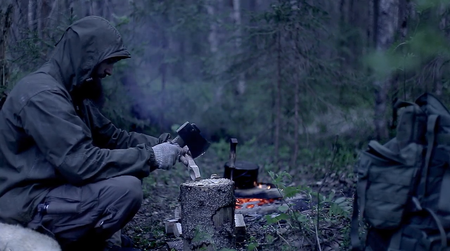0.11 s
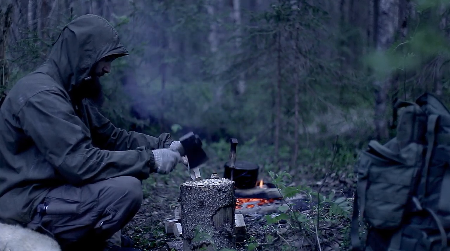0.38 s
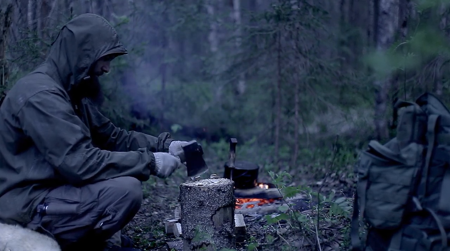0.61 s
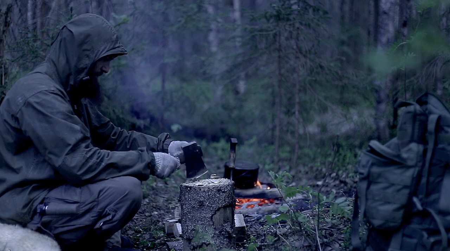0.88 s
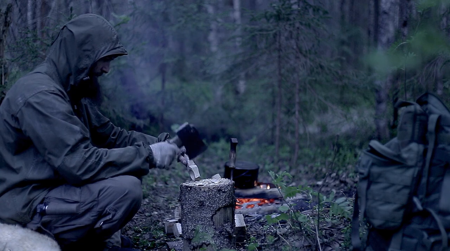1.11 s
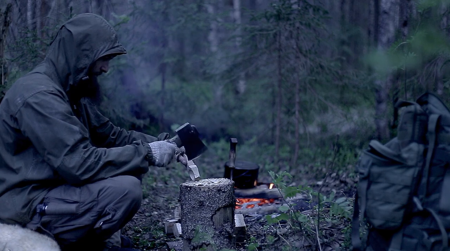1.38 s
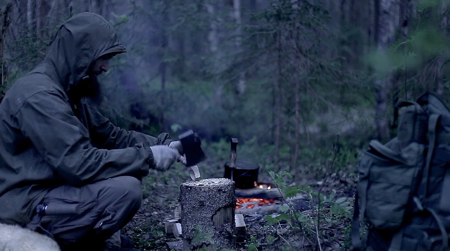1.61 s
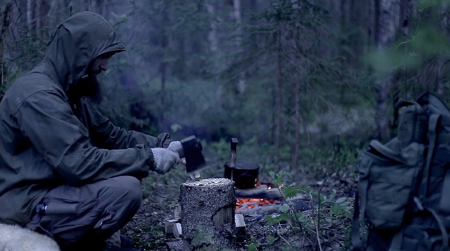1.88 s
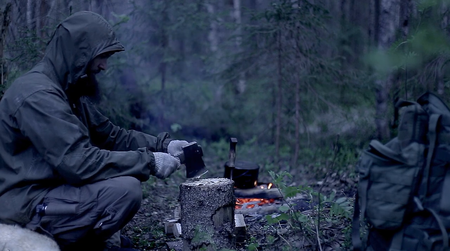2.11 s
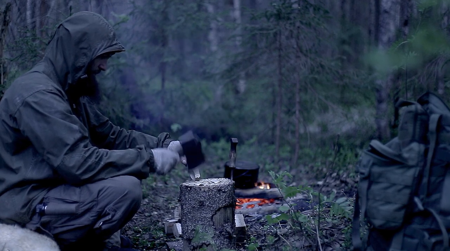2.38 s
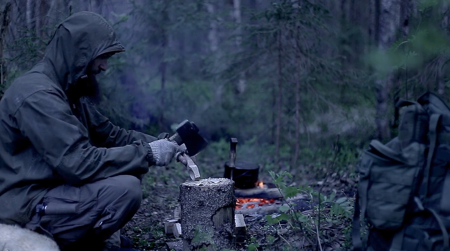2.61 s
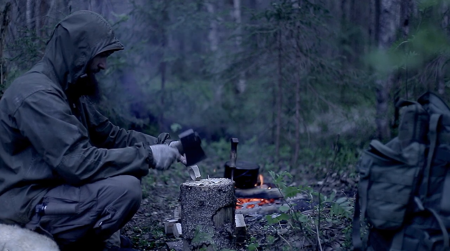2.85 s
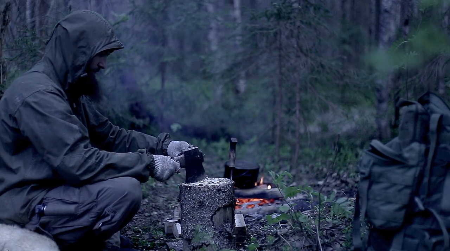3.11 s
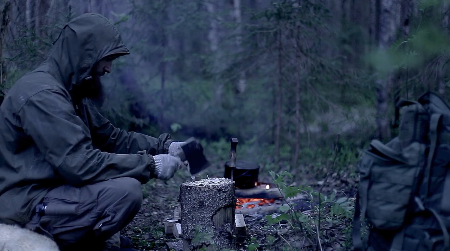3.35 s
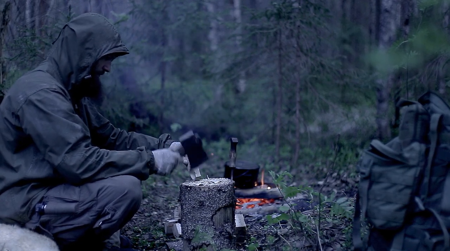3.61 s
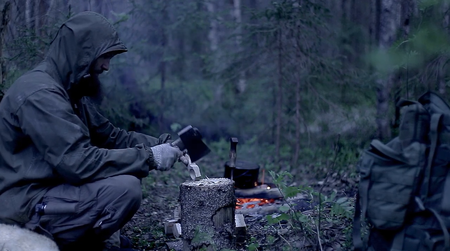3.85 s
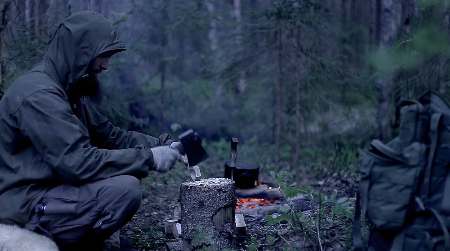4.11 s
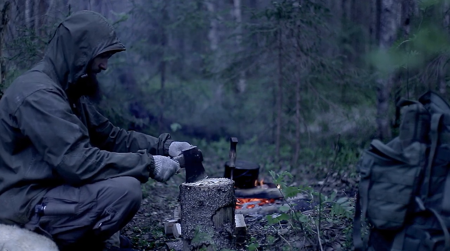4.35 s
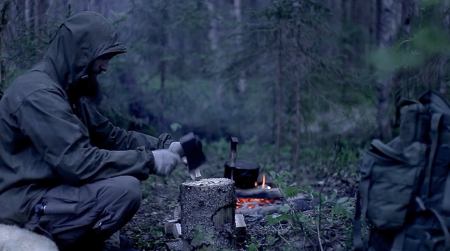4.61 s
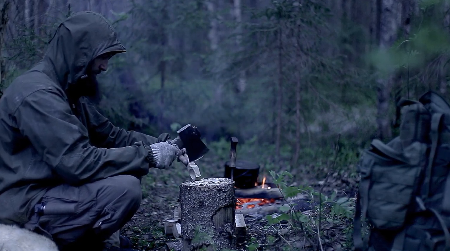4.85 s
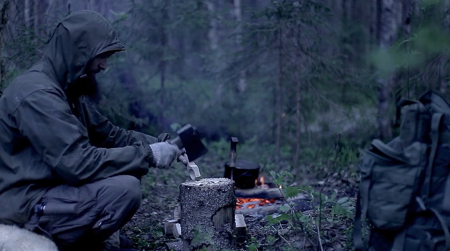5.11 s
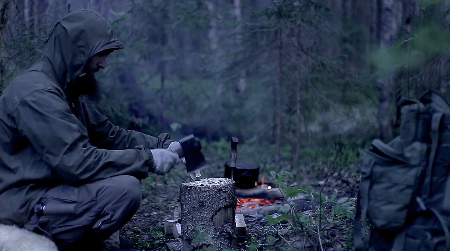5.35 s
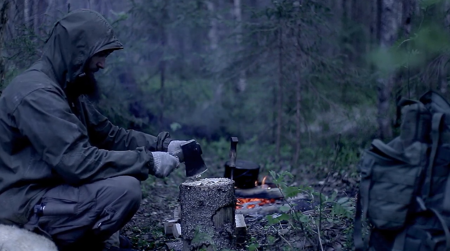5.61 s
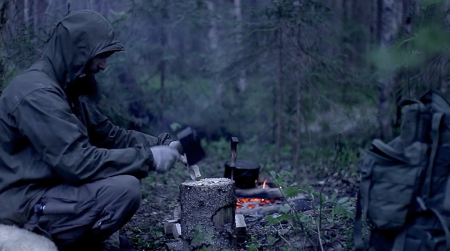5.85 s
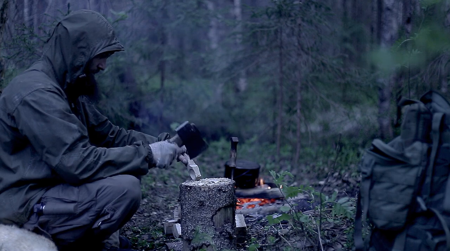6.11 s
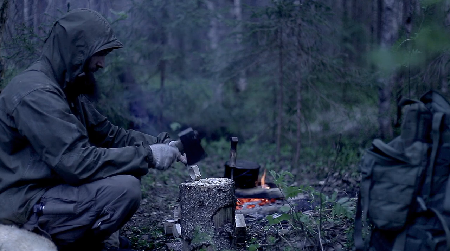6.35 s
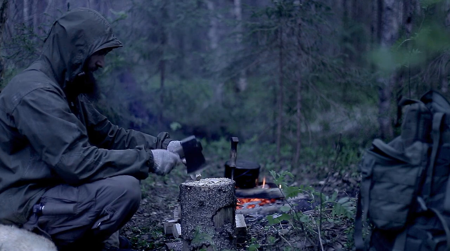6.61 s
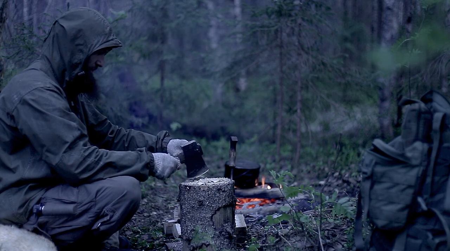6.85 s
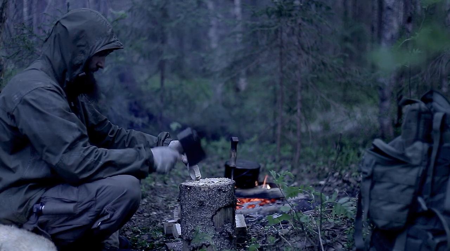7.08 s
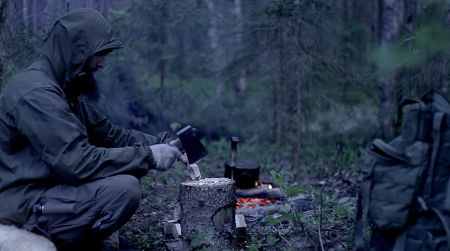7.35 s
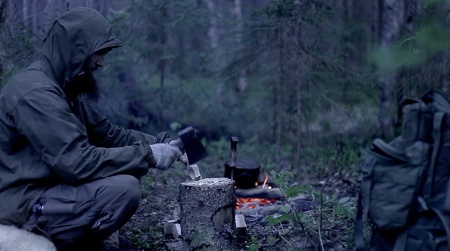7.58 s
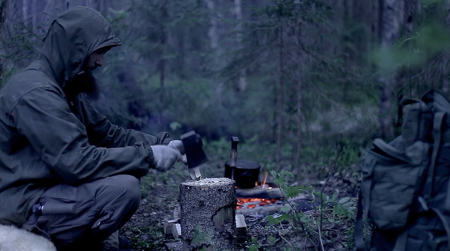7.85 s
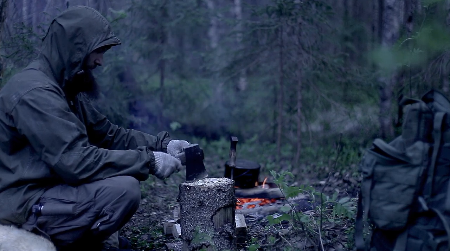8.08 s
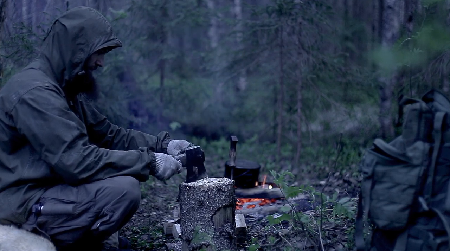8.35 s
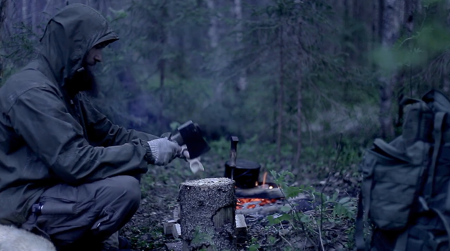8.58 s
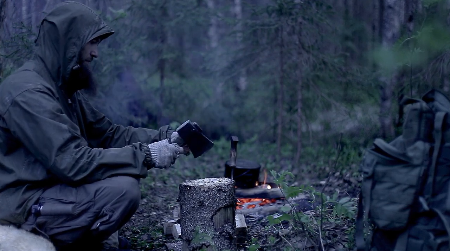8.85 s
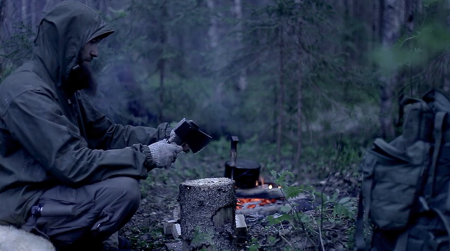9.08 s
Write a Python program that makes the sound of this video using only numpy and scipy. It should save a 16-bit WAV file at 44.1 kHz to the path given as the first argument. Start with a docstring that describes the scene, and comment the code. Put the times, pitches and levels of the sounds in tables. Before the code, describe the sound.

Steady chopping of kindling on a stump, close to the microphone: crisp, dry wood cracks mixed with short metallic clicks, uneven in strength and growing harder past the middle. A loosened blade briefly rings a few times and bits of wood clatter down. Trunks return a faint scattered slap, the soil gives a late low shudder, and a soft airy wash continues after knocking stops near eight and a quarter seconds.

```python
"""A hatchet stuck in a stick of kindling is knocked on a stump in a forest, about three blows a second.
Each blow is one to three quick contacts, made of decaying sine modes of wood and steel; loud ones overload.
The loosened blade rings on and split pieces drop; faint ticks and scrapes are short rings and band noise.
Trunks send back echoes (convolution with sparse noise), the soil carries a late low shudder to the
microphone stand, and shaped noise makes a soft wash of forest air, with amplifier hiss."""
import sys
import numpy as np
from scipy import signal
from scipy.fft import rfft, irfft
from scipy.io import wavfile

SR = 44100
rng = np.random.default_rng(int(sys.argv[2]) if len(sys.argv) > 2 else 0)


def store_pcm(level_fs):
    """Save levels as 16-bit WAV."""
    pcm = np.round(np.clip(level_fs, -1, 1) * 32767).astype(np.int16)
    wavfile.write(sys.argv[1], SR, np.atleast_2d(pcm).T)


def boost(x):
    """Linear amplitude factor 10**(x/20) for a level x in decibels (scalar or array-like)."""
    u = np.asarray(x, float) / 20
    return 10 ** u


N = 406161

# air wash: frequency_hz, relative_density_db
AIR_SPECTRUM = [(12, -64), (20, 6), (119, -0.5), (289, -1), (323, -3), (392, -2.5), (595, -2), (703, -1.5),
                (1010, -7.5), (1910, -13.5), (2260, -11.5), (4290, -15), (15400, -22.5)]
# hollow notes in the air: centre_hz, width_hz, added_db
AIR_NOTES = [(281, 22, 8), (439, 80, 2.5), (970, 50, 3.5), (1540, 360, 6)]
AIR_RMS_DB, HISS_RMS_DB = -50.5, -58

# soil waves: frequency_hz, level_db, t60_s, travel_s
SOIL_WAVES = [(61.4, 0.9, 0.63, 0.053), (52.9, -9.2, 0.9, 0.0681), (40.2, 0.2, 0.62, 0.0653),
              (28.2, 4.8, 0.45, 0.0801), (23.1, -13.5, 2.0, 0.0811), (59.2, 12.0, 0.38, 0.0765)]
# the shudder levels off once the weight passes what the soil yields to
SHUDDER_DB, SOIL_YIELDS_DB = -37.5, -25

# near trunks: delay_s, level_db
TRUNK_ECHOES = [(0.019, -23), (.059, -26), (.086, -42.5)]
# reflection colour of bark and needles: frequency_hz, gain_db
BARK_COLOUR = [(500, -22.5), (1200, -11.5), (1700, -1), (2400, 4.5), (3200, 0), (3800, -1.5), (4300, 2.5),
               (5300, -2), (6200, -7.5), (8200, -5.5), (11000, -27)]
ECHO_SMEAR_S = 0.0016
SCATTER_DB, SCATTER_T60_S = -57.5, 0.7   # many far trunks

# faint ticks from the fire: start_s, level_db, pitch_hz
FIRE_TICKS = [(0.029, -37, 4970), (.063, -41.5, 5200), (2.082, -28, 1700), (2.667, -34, 7500),
              (5.109, -44, 7600), (5.938, -50, 7000), (5.948, -53, 6500), (5.985, -48, 7500)]
# stick slides on the stump: start_s, end_s, level_db
STICK_SCRAPES = [(0.799, 0.826, -38.5), (8.215, 8.234, -45)]

# nearly loose blade is set ringing: start_s, level_db
LOOSE_HITS = [(2.984, -35), (4.238, -28), (7.923, -40), (8.240, -32.5)]
# loose blade modes: frequency_hz, level_db, t60_s
LOOSE_MODES = [(3790, -6.5, 0.16), (7340, 2.5, 0.053)]
# split piece drops on the stump, sometimes the hatchet after it: start_s, level_db, weight_db
PIECE_DROPS = [(2.999, -14, -24), (3.321, -42.5, -69), (4.2587, -17, -21.5), (7.9433, -20, -51.5),
               (8.258, -14.5, -31)]
# split piece modes: frequency_hz, level_db, t60_s
PIECE_MODES = [(242, 10, 0.011), (583, 1.5, 0.017), (854, 13.5, 0.0093), (1400, 2, 0.015), (2170, 0, 0.014),
               (3950, -5.5, 0.0077)]

# stick modes: stick_pitch_ratio, level_db, t60_s (before damping)
STICK_MODES = [(0.761, -19.5, 0.036), (0.932, 0.5, 0.016), (1.07, 6, 0.012)]
# stick overtones: frequency_hz, level_db, t60_s (before damping)
OVERTONE_MODES = [(2080, -1.5, 0.0089), (2316, 1, 0.0093), (2910, -14, 0.0081)]
# blade modes: blade_pitch_ratio, level_db, t60_s (before damping)
BLADE_MODES = [(.87, -5.5, 0.0085), (.96, 1.5, 0.012), (1.04, 2, 0.013), (1.25, -21, 0.026)]
# contact crack: frequency_hz, level_db, t60_s
CRACK_MODES = [(3066, -31.5, 0.00075), (6100, -23, 0.0014), (7134, 0.5, 0.0023), (7940, -13, 0.012),
               (9320, -7, 0.01), (11320, -7.5, 0.003), (14800, -25, 0.0065)]
# blade edge, sent sideways to the trunks only: frequency_hz, level_db, t60_s
EDGE_MODES = [(4700, -7, .003), (5200, -2, .007)]
# hollow note of the weight: frequency_hz, level_db, t60_s
HOLLOW_MODES = [(785, 1, 0.047)]
# stump body: frequency_hz, level_db, t60_s
STUMP_MODES = [(222, -1.5, 0.032), (331.6, 0, 0.024), (444, 2.5, 0.012)]
# stump roots: frequency_hz, level_db, t60_s
ROOT_MODES = [(72.4, 3, 0.094), (143, 2, 0.028)]
# stick lands on the stump: start_s, level_db, pitch_hz, overtones_re_stick_db, weight_db
STICK_LANDINGS = [(0.2168, -11.5, 1370, -3, -36.5), (0.5186, -4, 1610, -5, -28.5),
                  (.8286, -9, 1550, -1, -28), (1.135, -7, 1395, -19, -18), (1.407, -32.5, 1500, 2, -49),
                  (1.44, -26, 1510, 0, -50), (1.4462, -14, 1510, 3.5, -23), (1.7425, -6, 1606, -11, -26),
                  (2.0494, -2, 1630, -21.5, -23), (2.3566, -7.5, 1600, 2.5, -54),
                  (2.36, -3, 1666, 7, -18.5), (2.4962, -27, 1060, 0.5, -37), (2.677, -6, 1470, -5, -23.5),
                  (2.9785, -15, 1430, -11, -49), (2.9828, -5.5, 1445, -7, -30.5),
                  (3.6045, -7.5, 1400, -7, -27.5), (3.9051, -9, 1180, -7.5, -17),
                  (4.2363, -12.5, 1370, -15, -31), (4.56, -13, 1510, 2.5, -23.5),
                  (4.8634, -5.5, 1580, 1, -21.5), (5.1692, -3.5, 1433, 8.5, -21.5),
                  (5.4884, -10.5, 1570, -10, -61), (5.49, -2.5, 1542, -3, -19),
                  (5.8058, 2, 1680, -4.5, -17.5), (6.1091, -6.5, 1707, 10.5, -27),
                  (6.4288, -2, 1594, -4, -18), (6.7323, -6.5, 1620, 2, -20),
                  (7.0366, -2.5, 1616, -1, -27.5), (7.0424, -22, 1560, 11, -28), (7.3352, -1, 1580, 0, -31),
                  (7.625, -0.5, 1640, 2.5, -22.5), (7.919, -2, 1576, 4, -20.5),
                  (8.2391, -6.5, 1574, -22, -27.5)]
# head jolts in the split, mostly close to a landing, once a faint tap between blows:
# start_s, level_db, pitch_hz, crack_re_blade_db, edge_re_blade_db
HEAD_JOLTS = [(.221, -11.5, 4070, -8, -3), (0.5197, -8.5, 3950, -7, -1), (.832, -3, 3900, -8, -12),
              (1.1353, -11, 3940, -9, -26), (1.2732, -28.5, 4060, -6, -29), (1.4461, -8, 4000, -9, -22.5),
              (1.7395, -2.5, 3900, -9, 1), (2.0483, -9, 3580, -4.5, -4), (2.3564, 1, 4040, -4.5, 1),
              (2.4958, -34, 4350, 10, -10), (2.678, -1, 3950, -18, -27), (2.9826, -8.5, 4010, -11, -31),
              (3.6044, -14.5, 3930, -27, -19), (3.9057, -14.5, 4050, -24, -30),
              (4.2369, -12.5, 4060, -7, -17), (4.561, -6, 3820, -12.5, -7), (4.8628, -10, 3840, -8, -34),
              (5.1679, 1, 3850, -8, -0.5), (5.4908, 3.5, 4090, -6.5, -6.5), (5.8052, -4, 3980, -2, -1),
              (6.1096, 9, 4070, -11.5, -8), (6.4319, 2.5, 4155, -11.5, -19),
              (6.737, -3.5, 3970, -12.5, -11), (7.0361, -3, 4020, -10, -11), (7.0422, -7, 4050, -8.5, 2),
              (7.334, -5, 3950, -15, -16), (7.6279, -0.5, 4140, -5.5, -10), (7.922, -1, 3790, -9.5, -11),
              (8.2393, -4.5, 3980, -9.5, -21), (8.2571, -10.5, 4130, -18, -19)]
# each part also stirs the other a little
JOLT_STICK_DB, JOLT_OVERTONE_DB, LANDING_CRACK_DB = -11.5, -9.5, -17.5
HOLLOW_RE_WEIGHT_DB = -8
PUSH_DB, PUSH_GROWTH_DB_PER_DB = -4, 1.4   # shove into the soil: level at 0 dB weight, slope

# recorder gain control
LIMIT_DB, SQUEEZE_DB_PER_DB, ATTACK_S, RELEASE_DB_PER_S = -5, 0.48, 0.003, 29.5
CUTOFF_HZ = 15480


def read_spectrum(points, hz):
    """Interpolates dB linearly over log frequency."""
    point_hz, point_db = np.array(points).T
    return np.interp(np.log(hz), np.log(point_hz), point_db)


def strike(hits, modes, rise_s, pitch_hz=1, damping=1, chatter=0.29):
    """Each hit (s, dB) rings all modes, randomly off in level and pitch; contact builds up over rise_s."""
    length = 3072
    out, t = np.zeros(N + length), np.arange(length) / SR
    hz, level_db, t60_s = np.array(modes).T[:, :, None]
    spread_db, detune = 1.5, 0.015
    chance = rng.standard_normal((len(hits), 2, len(modes), 1))
    # crushing fibres: weaker touches follow the first for a few ms; unit energy in all
    touched = rng.random((len(hits), 200)) < 0.06
    touches = chatter * rng.standard_normal((len(hits), 200)) * touched
    touches = touches * np.exp(-t[:200] / 0.0015)
    touches[:, 0] = 1
    touches = touches / np.sqrt(np.sum(touches ** 2, axis=1, keepdims=True))
    scales = pitch_hz * np.ones(len(hits))
    for (s, db), luck, scale, touch in zip(hits, chance, scales, touches):
        envelope = boost(db + level_db + spread_db * luck[0] - 60 * damping * t / t60_s)
        ring = envelope * np.sin(2 * np.pi * scale * hz * (1 + detune * luck[1]) * t)
        contact = ring.sum(axis=0) * (1 - np.exp(-t / rise_s))
        at = round(s * SR)
        out[at:at + length] += np.convolve(contact, touch)[:length]
    return out[:N]


def weights():
    """(s, dB) of every load that the stump takes."""
    return np.array([(row[0], row[-1]) for row in STICK_LANDINGS + PIECE_DROPS])


def air():
    """Smooth noise, falling to the treble, with a few resonant hollow notes."""
    hz = np.maximum(np.arange(N // 2 + 1) * SR / N, 10)
    colour = boost(read_spectrum(AIR_SPECTRUM, hz))
    for centre_hz, width_hz, db in AIR_NOTES:
        colour = colour * (1 + boost(db) / (1 + (2 * (hz - centre_hz) / width_hz) ** 2))
    wash = irfft(rfft(rng.standard_normal(N)) * colour, N)
    return boost(AIR_RMS_DB) * wash / np.std(wash)


def ground():
    """Slow soil waves arrive late and shake the stand in the same pattern after every blow."""
    t = np.arange(SR) / SR
    wave = np.zeros(SR)
    for hz, db, t60_s, travel_s in SOIL_WAVES:
        since = np.maximum(t - travel_s, 0)
        swell = 1 - np.exp(-since / 0.033)
        wave += boost(db - 60 * since / t60_s) * np.sin(2 * np.pi * hz * since) * swell
    blows = np.zeros(N)
    for s, weight_db in weights():
        blows[round(s * SR)] += boost(SHUDDER_DB) / np.sqrt(1 + boost(2 * (SOIL_YIELDS_DB - weight_db)))
    return signal.fftconvolve(blows, wave)[:N]


def forest(x):
    """A few distinct trunk echoes plus a dying cloud of sparse ones, coloured by the bark."""
    t = np.arange(SR // 2) / SR
    # exponential spread in dB makes the cloud sparse
    sparse_db = 4.04 * np.minimum(rng.exponential(1, len(t)), 3.5)
    cloud = rng.standard_normal(len(t)) * boost(sparse_db)
    trunks = cloud * boost(SCATTER_DB - 60 * t / SCATTER_T60_S) * np.clip(t / 0.002, 0, 1)
    for delay_s, db in TRUNK_ECHOES:
        # a rough trunk smears its echo
        smear = rng.standard_normal(600) * np.exp(-t[:600] / ECHO_SMEAR_S)
        at = round(delay_s * SR)
        trunks[at:at + 600] += boost(db) * smear / np.sqrt(np.sum(smear ** 2))
    hz = np.maximum(np.arange(len(t) // 2 + 1) * SR / len(t), 10)
    trunks = irfft(rfft(trunks) * boost(read_spectrum(BARK_COLOUR, hz)), len(t))
    return signal.fftconvolve(x, trunks)[:N]


def fire_ticks():
    """Each tick rings two short modes for a few cycles."""
    ticks = np.array(FIRE_TICKS)
    modes = [(0.96, 1, 0.0052), (1.8, 3, 0.0027)]   # pitch_ratio, level_db, t60_s
    return strike(ticks[:, :2], modes, 0.0001, ticks[:, 2])


def scrapes():
    """Friction of the stick on the stump: rough noise in the middle band."""
    band = signal.butter(2, [900, 3600], "band", fs=SR, output="sos")
    rough = signal.sosfilt(band, rng.standard_normal(N))
    t, out = np.arange(N) / SR, np.zeros(N)
    for start_s, end_s, db in STICK_SCRAPES:
        gate = np.interp(t, [start_s, start_s + 0.0056, end_s, end_s + 0.002], [0, 1, 1, 0])
        out += boost(db) * rough * gate
    return out


def splitting():
    """The loosened blade rings; each piece drop damps it within ms and rings the piece."""
    ring = strike(LOOSE_HITS, LOOSE_MODES, 0.00057, chatter=0)
    t = np.arange(N) / SR
    for s, _, _ in PIECE_DROPS:
        stopped = (t > s) & (t < s + 0.1)
        ring = ring * np.where(stopped, np.exp(-np.abs(t - s) / 0.002), 1)
    return ring - strike(np.array(PIECE_DROPS)[:, :2], PIECE_MODES, 0.00089, chatter=0.17)


def knocks(damping, sideways):
    """Landings ring the wood, head jolts the steel, both within about a ms; weight goes into the stump."""
    land_s, stick_db, stick_hz, overtone_db, weight_db = np.transpose(STICK_LANDINGS)
    jolt_s, blade_db, blade_hz, crack_db, edge_db = np.transpose(HEAD_JOLTS)
    both_s = np.r_[land_s, jolt_s]
    # a jolt stirs the stick at the pitch of the nearest landing
    nearest = np.abs(jolt_s[:, None] - land_s).argmin(axis=1)
    grip_hz = np.r_[stick_hz, stick_hz[nearest]]

    stick_hits = np.c_[both_s, np.r_[stick_db, blade_db + JOLT_STICK_DB]]
    overtone_hits = np.c_[both_s, np.r_[stick_db + overtone_db, blade_db + JOLT_OVERTONE_DB]]
    crack_hits = np.c_[both_s, np.r_[stick_db + LANDING_CRACK_DB, blade_db + crack_db]]
    out = strike(stick_hits, STICK_MODES, 0.00062, grip_hz, damping, chatter=0.42)
    out += strike(overtone_hits, OVERTONE_MODES, 0.00039, damping=damping, chatter=0.58)
    out += strike(np.c_[jolt_s, blade_db], BLADE_MODES, 0.00068, blade_hz, damping, chatter=0.93)
    out += strike(crack_hits, CRACK_MODES, 0.00012, chatter=0.93)
    if sideways:
        return out + strike(np.c_[jolt_s, blade_db + edge_db], EDGE_MODES, 0.00031)

    loads = weights()
    pushes = loads * [1, PUSH_GROWTH_DB_PER_DB] + [0, PUSH_DB]
    out += strike(np.c_[land_s, weight_db + HOLLOW_RE_WEIGHT_DB], HOLLOW_MODES, 0.0006, chatter=0)
    out += strike(loads, STUMP_MODES, 0.00068, chatter=0)
    out += strike(pushes, ROOT_MODES, 0.0023, chatter=0)
    return out


def scene():
    """One microphone feeds both channels; the trunks get a drier, less ringing side of each blow."""
    background = air() + ground()
    returned = forest(knocks(damping=2.7, sideways=True))
    details = fire_ticks() + scrapes() + splitting()
    direct = knocks(damping=1, sideways=False)
    return np.tile(background + returned + details + direct, (2, 1))


def gain_control(x):
    """Peaks over the limit pull the gain down with a lag; it climbs back steadily in dB."""
    peak_db = 20 * np.log10(np.abs(x).max(axis=0) + 1e-9)
    over_db = np.maximum(peak_db - LIMIT_DB, 0)
    ramp_db = RELEASE_DB_PER_S * np.arange(N) / SR
    held_db = np.maximum.accumulate(SQUEEZE_DB_PER_DB * over_db + ramp_db) - ramp_db
    lag = np.exp(-1 / (ATTACK_S * SR))
    return x * boost(-signal.lfilter([1 - lag], [1, -lag], held_db))


def roll_off(x):
    """The treble ends steeply here."""
    return signal.sosfilt(signal.butter(12, 16390, fs=SR, output="sos"), x)


def record(dry):
    """Hiss per channel, gain control, a steep top cut, then hard overload at full scale."""
    hiss = boost(HISS_RMS_DB) * rng.standard_normal((2, N))
    levelled = gain_control(dry + hiss)
    top_cut = signal.ellip(10, 0.5, 50, CUTOFF_HZ, fs=SR, output="sos")
    mix = np.clip(signal.sosfilt(top_cut, levelled), -1, 1)
    return roll_off(mix)


dry = scene()
out = record(dry)
store_pcm(out)
```